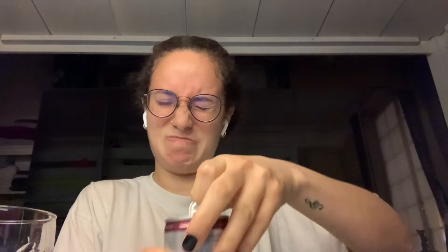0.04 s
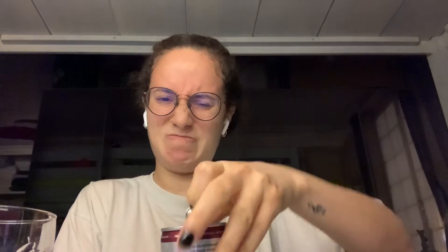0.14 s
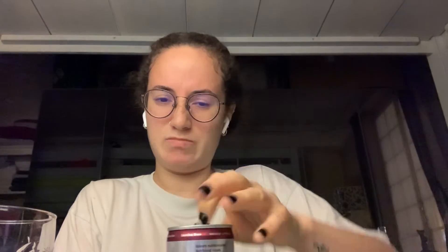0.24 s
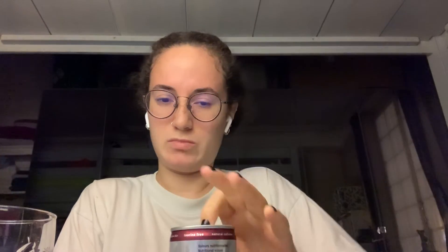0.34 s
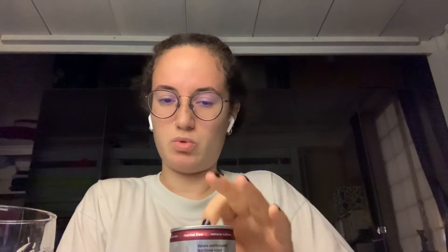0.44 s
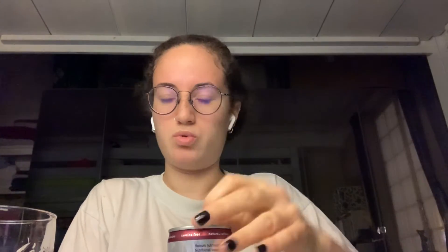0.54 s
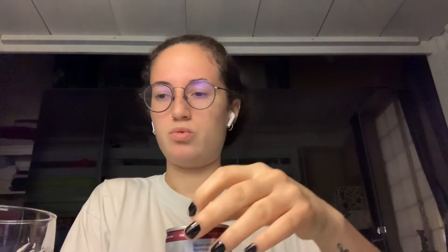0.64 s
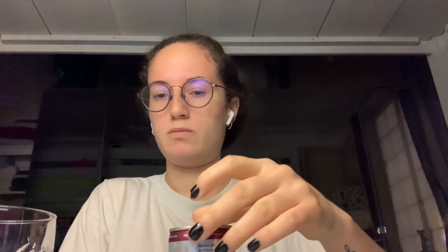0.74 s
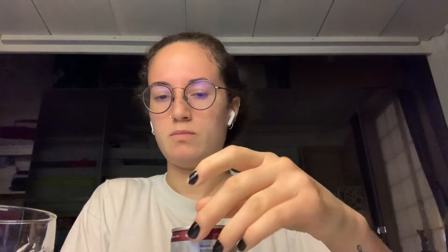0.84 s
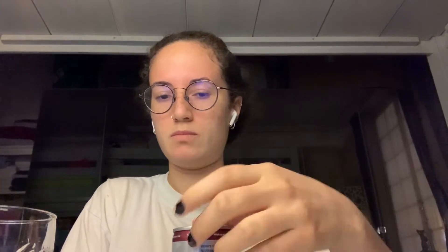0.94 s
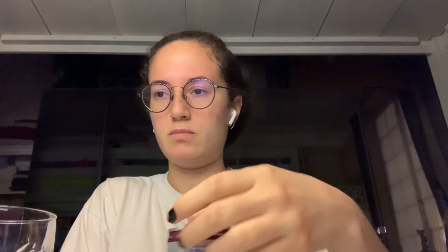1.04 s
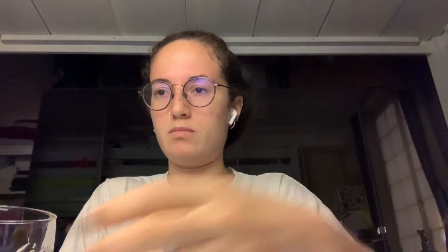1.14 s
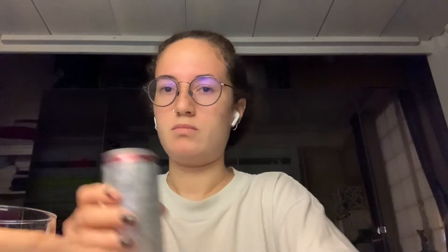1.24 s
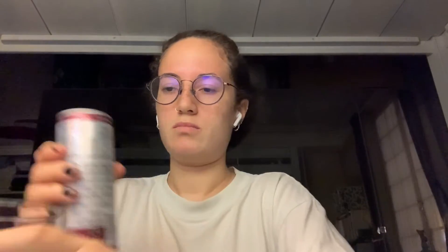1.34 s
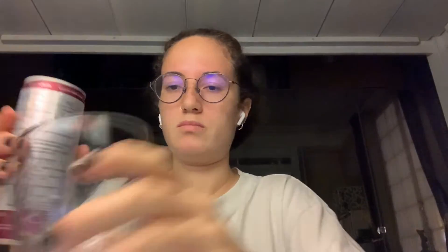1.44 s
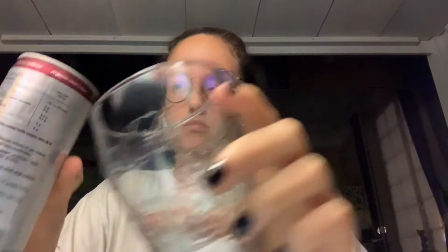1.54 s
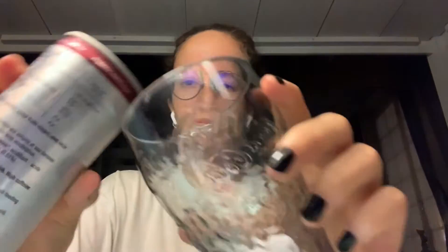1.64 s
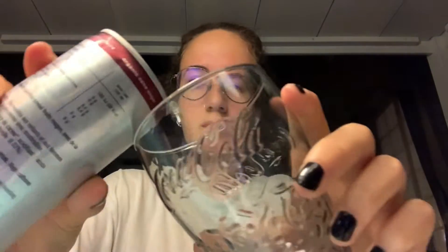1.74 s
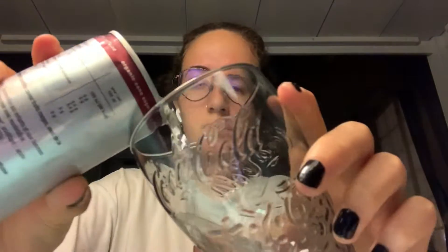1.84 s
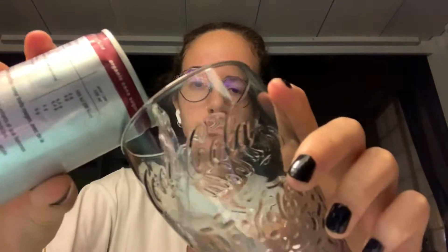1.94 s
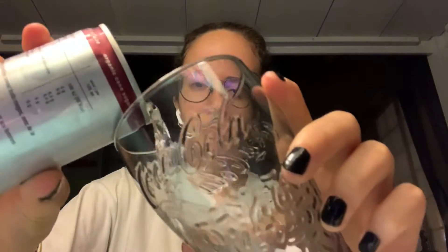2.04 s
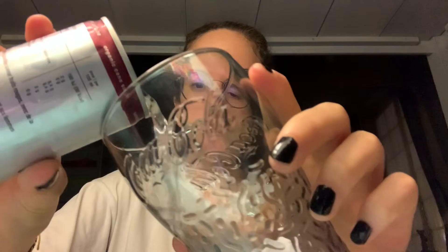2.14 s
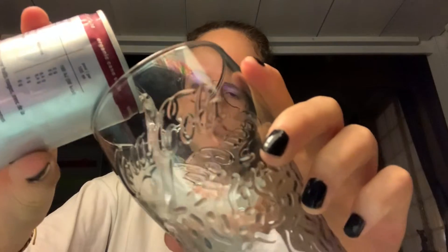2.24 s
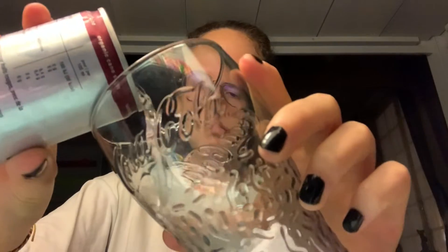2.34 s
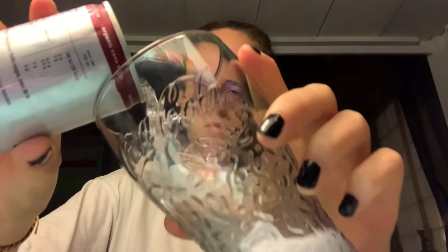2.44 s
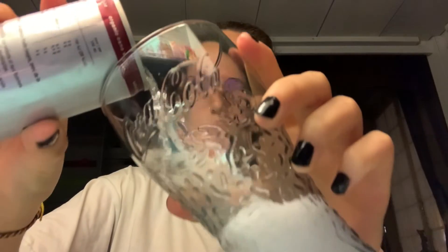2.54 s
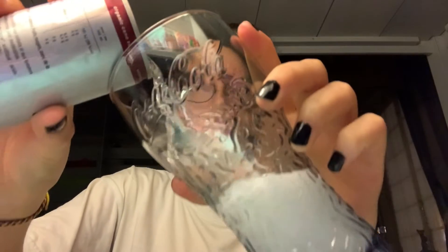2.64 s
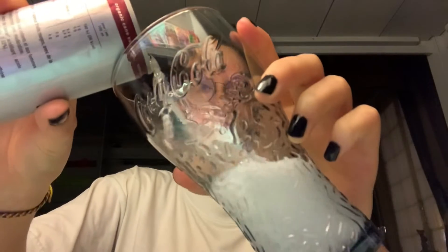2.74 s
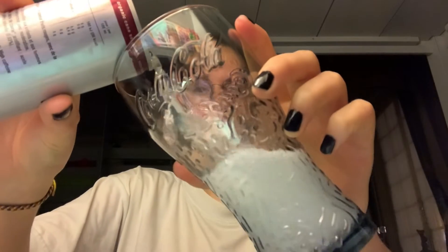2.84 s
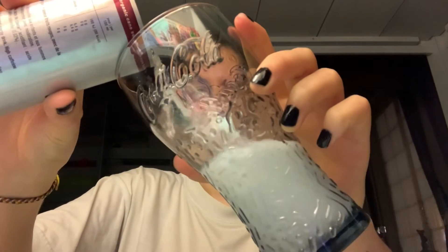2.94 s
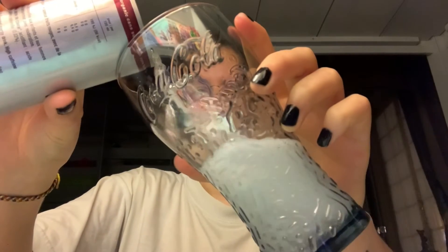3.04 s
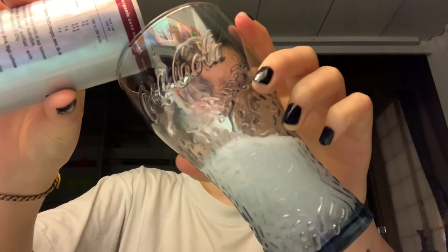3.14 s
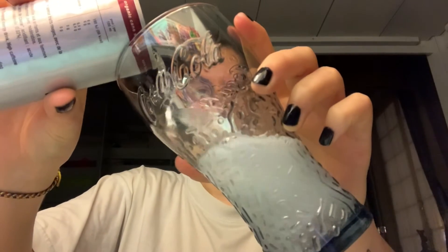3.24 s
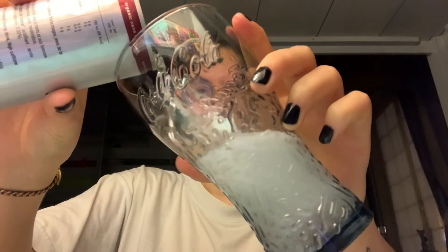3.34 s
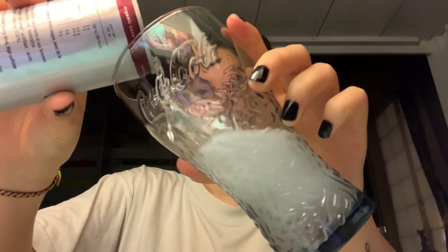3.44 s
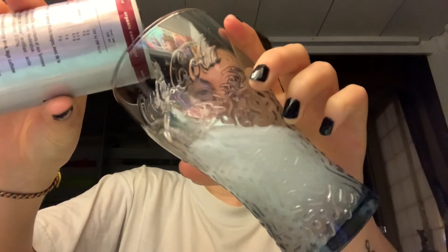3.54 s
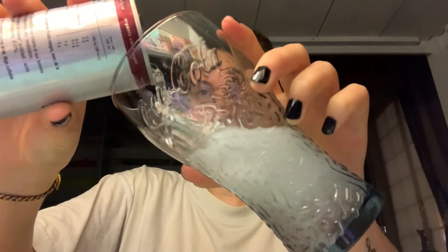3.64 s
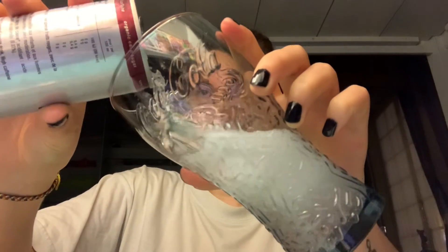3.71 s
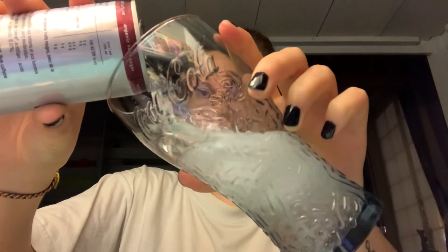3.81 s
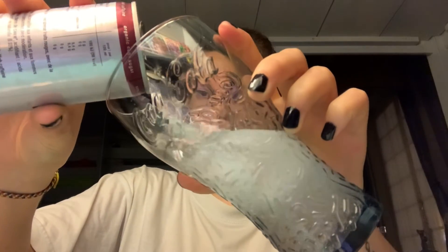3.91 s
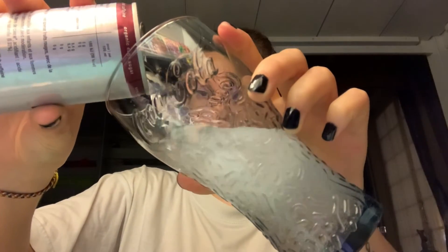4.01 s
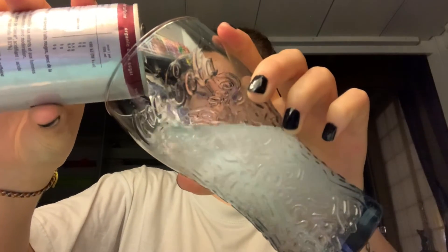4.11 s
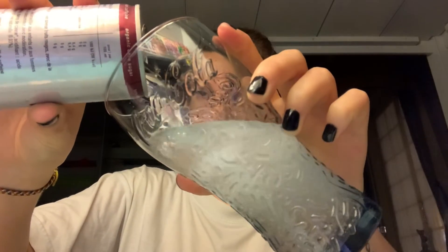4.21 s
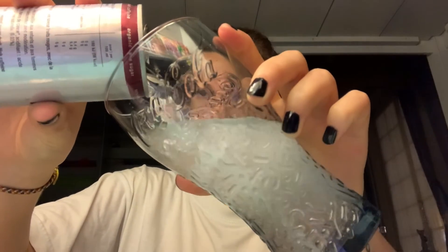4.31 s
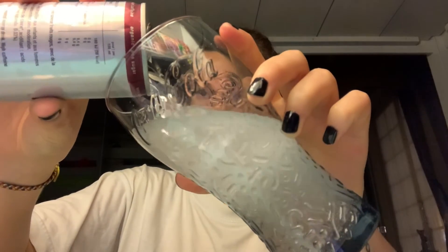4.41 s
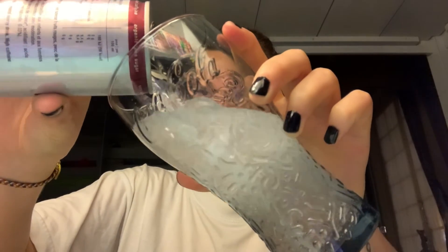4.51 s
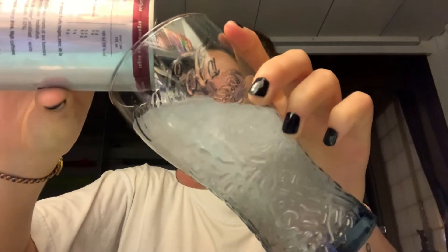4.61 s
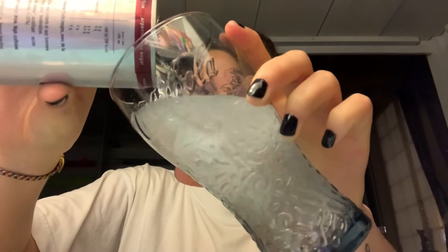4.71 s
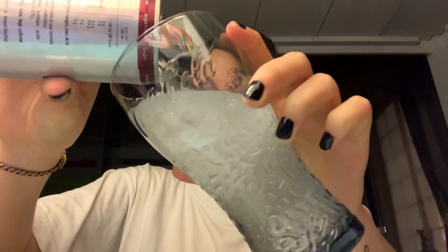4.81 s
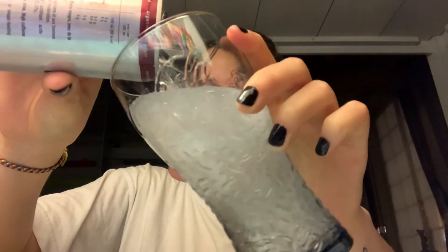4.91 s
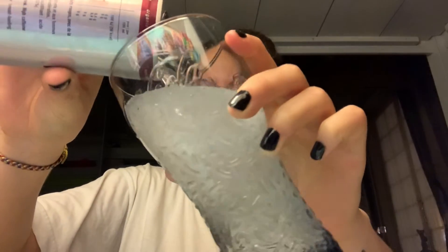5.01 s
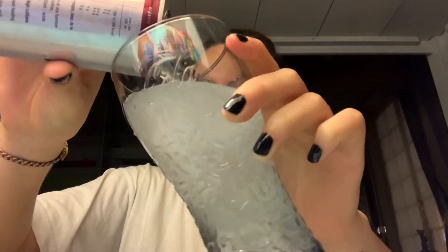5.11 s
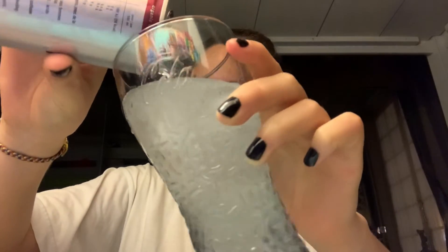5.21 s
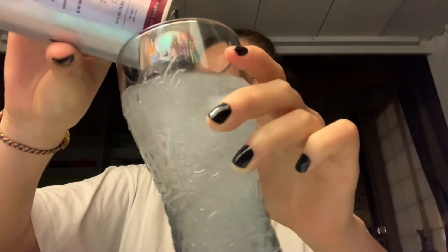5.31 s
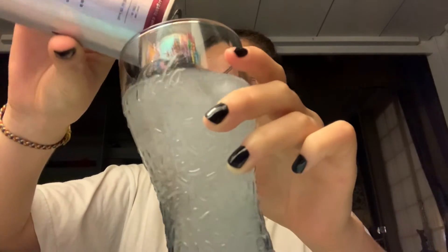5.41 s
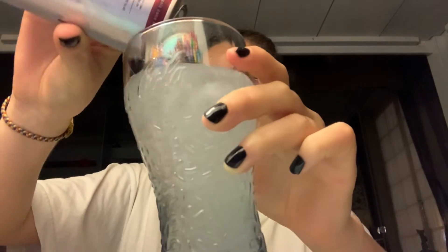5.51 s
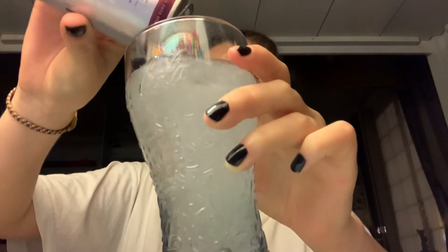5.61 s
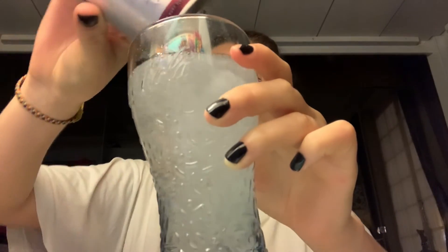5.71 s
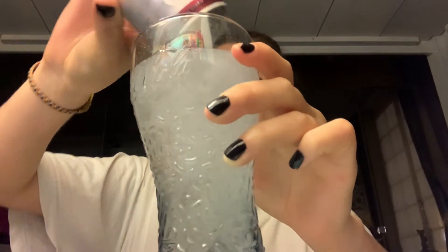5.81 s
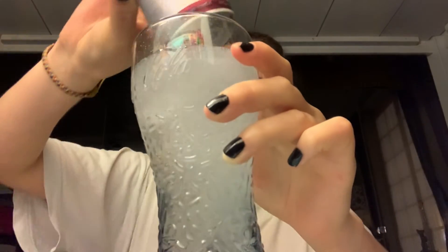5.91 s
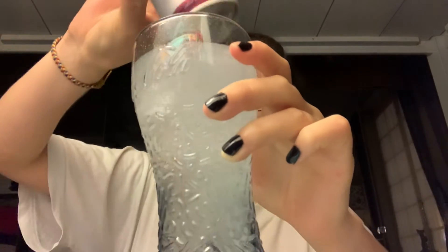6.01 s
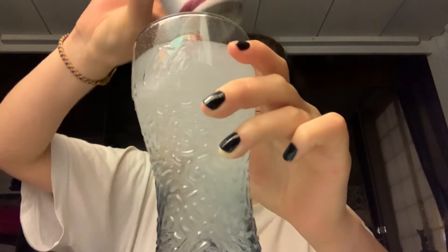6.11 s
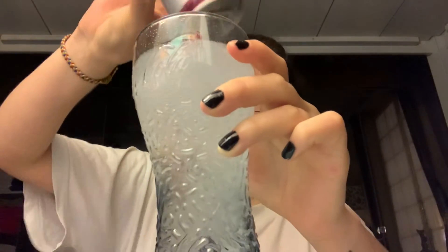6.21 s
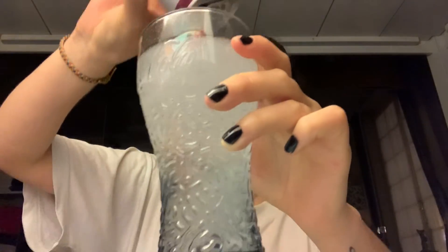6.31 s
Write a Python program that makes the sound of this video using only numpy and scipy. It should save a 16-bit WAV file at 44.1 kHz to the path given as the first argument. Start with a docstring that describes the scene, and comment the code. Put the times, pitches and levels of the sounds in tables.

```python
"""A drink can is cracked open close by: bursts of noise tear and ring the lid, and shaped hiss spits out as gas.
Nails tick on the tab, fingers rub, and there are short knocks and dull bumps: coloured noise and low pulses.
Can and glass touch with short damped rings. Then the drink is poured: it gulps and plops as ringing bubbles,
while random tiny pops gurgle, trickle, fizz and foam under the shifting air resonances of the glass.
Behind it lie the noise of a small quiet room and a faint electric buzz of alternating ticks."""
import sys
import numpy as np
from scipy import signal
from scipy.fft import rfft, irfft, next_fast_len
from scipy.io import wavfile
from scipy.ndimage import uniform_filter1d

SR = 44100
rng = np.random.default_rng(int(sys.argv[2]) if len(sys.argv) > 2 else 0)


def put_to_file(sound):
    """Save the sound as 16-bit audio at rate SR, in the file named by the first command-line argument."""
    columns = np.atleast_2d(sound).T  # one column per channel
    safe = np.clip(columns, -1, 1)
    whole_steps = np.round(safe * 32767)
    wavfile.write(sys.argv[1], SR, whole_steps.astype(np.int16))


N = 280160  # length [samples]
# Levels are relative: spectra are scaled to unit energy, and each source adds its own trim.


def amp(db):
    """Decibels to gain."""
    return 10 ** (np.asarray(db) / 20)


def unit(x):
    """Scale to rms 1."""
    return x / np.sqrt(np.mean(x ** 2) + 1e-20)


def clock(size=N):
    """Sample times in seconds."""
    return np.arange(size) / SR


def along(points, hz):
    """Read (frequency, value) points on a log frequency axis."""
    f, v = np.transpose(points)
    return np.interp(np.log(hz + 1), np.log(f), v)


def curves(rows, t):
    """Each column after the time, read at the times t."""
    s, *cols = np.transpose(rows)
    return [np.interp(t, s, c) for c in cols]


def add(track, s, sound):
    """Mix a sound into the track at time s."""
    part = track[max(round(s * SR), 0):][:len(sound)]
    part += sound[:len(part)]


def hump(hz, centre, width):
    """Magnitude of one resonance, top 1."""
    return 1 / (1 + (2 * (hz - centre) / width) ** 2)


def colour(x, points, modes=(), size=8192):
    """Minimum-phase filter of unit energy: a broad spectrum with resonances on it."""
    hz = np.fft.rfftfreq(size, 1 / SR)
    # every resonance lifts the spectrum, whatever the sign of its level
    peaks = sum((amp(abs(db)) - 1) * hump(hz, c, w) for c, w, db in modes)
    gain = amp(along(points, hz)) * (1 + peaks)
    # folding the cepstrum makes the response causal
    cepstrum = irfft(np.log(gain))[:size // 2]
    cepstrum[1:] *= 2
    response = irfft(np.exp(rfft(cepstrum, size)))
    return signal.fftconvolve(x, response / np.linalg.norm(response))[:N]


def swell(t, rise, t60):
    """An envelope that rises to 1 at t = 0 and then dies away."""
    rising = np.exp(-abs(t) / max(rise, 1e-5))
    return np.where(t < 0, rising, amp(-60 * abs(t) / t60))


def bursts(rows, size=8192):
    """Short bursts of noise from rows (time [s], level [dB], rise [s], t60 [s])."""
    track, t = np.zeros(N), clock(size) - .02  # leaves 20 ms for the rise
    for s, db, rise, t60 in rows:
        shape = swell(t, rise, t60)
        burst = shape * rng.standard_normal(size)
        # every burst carries the energy of its envelope
        add(track, s + t[0], amp(db) * burst * np.linalg.norm(shape) / np.linalg.norm(burst))
    return track


def ring(modes, size=8192):
    """One blow on a set of decaying modes, each at a slightly new strength."""
    t = clock(size)
    scatter_db = 1.2 * rng.standard_normal(len(modes))
    return sum(amp(db + off_db - 60 * t / t60) * np.sin(2 * np.pi * hz * t)
               for (hz, db, t60), off_db in zip(modes, scatter_db))


def pops(rate, spread_db):
    """Tiny bubbles bursting at random, rate per second, with sizes spread in dB; rms 1."""
    sizes = amp(spread_db * np.clip(rng.standard_normal(N), -3, 3))
    return unit((rng.random(N) < rate / SR) * sizes * rng.choice([-1, 1], N))


def bubble(hz, t60, chirp, size=8192):
    """A pulsing bubble: it starts softly and its pitch rises as it nears the surface."""
    t = clock(size)
    return (1 - np.exp(-t / 0.001)) * amp(-60 * t / t60) * np.sin(2 * np.pi * hz * t * (1 + chirp * t))


# how long the room rings: (frequency [Hz], t60 [s])
ROOM_DECAY = [(150, 0.25), (1000, 0.086), (8000, 0.067), (15000, 0.056)]


def room(x, size=256):
    """A short diffuse tail of noise that dies sooner in the treble."""
    hz, t, z = signal.stft(rng.standard_normal(SR // 2), SR, nperseg=size)
    fading = z * amp(-60 * t / along(ROOM_DECAY, hz)[:, None])
    tail = signal.istft(fading, SR, nperseg=size)[1]
    tail = tail * (1 - np.exp(-clock(len(tail)) / 0.00043))  # soft onset
    return signal.fftconvolve(x, tail / np.linalg.norm(tail))[:N]


# spectrum of the room noise: (frequency [Hz], level [dB])
ROOM_NOISE = [(24, -57), (40, -13.5), (190, -2.5), (300, -9), (440, -9.5), (600, -5.5), (750, -9.5),
              (1050, -8.5), (1920, -17), (2800, -14.5), (3090, -16), (4390, -17.5), (5360, -14),
              (6230, -21.5), (8200, -12.5), (9060, -23), (11300, -15.5), (15700, -13)]
# broad spectrum of the buzz: (frequency [Hz], level [dB])
BUZZ_SPECTRUM = [(1500, -39), (3000, -10), (7500, -19), (9200, -22), (11000, -11), (15000, -3),
                 (15800, 1.5)]
# resonances of the buzz: (frequency [Hz], width [Hz], lift [dB], sign ignored)
BUZZ_RESONANCES = [(3185, 166, 12.5), (5570, 120, 19), (6540, 100, 22), (8320, 620, 22.5), (11340, 550, 8),
                   (12500, 130, -3), (13600, 200, -15.5), (14700, 85, 0), (16760, 90, 6.5)]


def background(weak=0.83):
    """Room noise and a thin electric buzz: a strong and a weak opposite tick in each half mains cycle."""
    period = SR / 100.04  # half a mains cycle [samples]
    starts = np.arange(0, N - period, period)
    # placed at four times the sample rate for finer timing
    ticks = np.zeros(4 * N)
    ticks[np.round(4 * starts).astype(int)] = 1
    ticks[np.round(4 * starts + 2 * period).astype(int)] = -weak
    buzz = colour(unit(signal.resample_poly(ticks, 1, 4)), BUZZ_SPECTRUM, BUZZ_RESONANCES)
    noise = colour(rng.standard_normal(N), ROOM_NOISE)
    return amp(-64.5) * noise + amp(-66.0) * buzz


# how far the drink has taken up the air space of the glass: (time [s], share [0-1])
GLASS_FILL = [(2.3, 0), (2.55, 0.1), (2.95, 0.27), (3.9, 0.31), (4.2, 0.44), (4.5, 0.65), (5.2, 0.68),
              (5.6, 1), (6.2, 1)]
# air resonances over the drink, shifting as the glass fills:
# (empty [Hz], full [Hz], width [Hz], lift when empty [dB], at the flare [dB], when full [dB])
GLASS_AIR = [(1560, 2750, 450, 13, 8, -9), (2630, 4140, 700, -1, 7, 16), (4430, 6400, 470, 10, -1.5, 0),
             (6600, 4600, 510, 3, 8, 0), (6860, 9500, 400, 4.5, 4, -3), (9800, 12500, 1160, 7, -0.5, 6)]
FLARE_FILL = 1  # share of the fill at which the drink reaches the wide top of the glass


def air_modes(t):
    """(centre Hz, width Hz, lift dB) of each air resonance at the times t, set by the fill of the glass."""
    fill, = curves(GLASS_FILL, t)
    return [(empty_hz * (full_hz / empty_hz) ** fill, width, np.interp(fill, [0, FLARE_FILL, 1], lifts_db))
            for empty_hz, full_hz, width, *lifts_db in GLASS_AIR]


def air_pitch(t):
    """Pitch in Hz of the first air resonance, the lowest one."""
    return air_modes(t)[0][0]


def in_glass(x, size=512):
    """The air above the drink shapes the sound at its resonances; a random gain makes it drift in uneven patches."""
    hz, t, z = signal.stft(x, SR, nperseg=size)
    lift_db = sum(db * hump(hz[:, None], centre, width) for centre, width, db in air_modes(t))
    # noise smoothed over pitch, then over time
    patches = uniform_filter1d(rng.standard_normal(z.shape), size=3, axis=0)
    patches = uniform_filter1d(patches, size=45, axis=1)
    patch_db = 1.9 * unit(patches)
    return signal.istft(z * amp(lift_db + patch_db), SR, nperseg=size)[1][:N]


# hiss in the resonance across the surface: it sinks as the surface widens, then rises and blurs
# under the foam: (time [s], centre [Hz], width [Hz], level [dB])
SURFACE_BAND = [(2.05, 6450, 406, -82), (2.35, 6420, 400, -67), (2.8, 6300, 400, -80),
                (3.5, 6130, 320, -66), (4.1, 5860, 280, -76), (4.6, 5680, 280, -72),
                (5.2, 5630, 280, -71.5), (5.5, 5900, 600, -77.5), (5.78, 6140, 850, -68.5),
                (6.05, 6500, 1010, -77), (6.35, 6000, 1000, -83)]


def surface_hiss(size=1024):
    """Bubbles bursting on the drink sound the air across the glass in one gliding band."""
    hz, t, z = signal.stft(pops(rate=1400, spread_db=5), SR, nperseg=size)
    centre_hz, width_hz, _ = curves(SURFACE_BAND, t)
    _, _, level_db = curves(SURFACE_BAND, clock())
    band = signal.istft(z * hump(hz[:, None], centre_hz, width_hz), SR, nperseg=size)[1][:N]
    return amp(level_db) * unit(band)


def babble(pitch, scatter, t60, count):
    """Small ringing bubbles at random moments, scattered around a pitch curve; rms 1."""
    track = np.zeros(N)
    moments = rng.integers(0, N, count)
    chance = np.clip(rng.standard_normal((count, 2)), -2, 2)
    for at, (off, loud) in zip(moments, chance):
        hz = pitch[at] * np.exp(scatter * off)
        add(track, at / SR, amp(0.6 * loud) * bubble(hz, t60, chirp=4.1, size=1500))
    return unit(track)


# the stream churns the drink where it plunges in: (time [s], level [dB])
GURGLE_LEVEL = [(1.9, -73.5), (2.2, -77.5), (2.6, -86), (2.9, -80.5), (3.2, -70.5), (3.7, -90), (4.1, -90),
                (4.35, -71), (4.55, -76), (5.0, -102), (5.6, -63.5), (5.9, -82), (6.2, -83)]
# the trickle comes in surges: (time [s], level [dB])
TRICKLE_LEVEL = [(1.9, -88), (2.15, -102), (2.45, -79.5), (3.2, -74), (3.7, -78), (4.1, -78), (4.6, -86),
                 (5.0, -86), (5.35, -81), (5.6, -80), (5.9, -76.5), (6.35, -80)]
# gas fizzes out while the stream strikes the bare wall, and again as the glass is righted:
# (time [s], level [dB])
FIZZ_LEVEL = [(2.05, -76), (2.27, -68.5), (2.55, -62), (3.0, -61), (3.75, -59.5), (4.0, -64), (4.25, -74),
              (4.6, -72.5), (5.0, -70), (5.4, -89), (5.8, -70.5), (6.35, -70.5)]
# the head of foam: (time [s], level [dB])
FOAM_LEVEL = [(2.05, -78), (2.25, -63), (2.5, -61.5), (2.8, -61.5), (3.8, -64), (4.5, -66.5), (5.5, -69.5),
              (5.85, -60), (6.35, -65.5)]
# their spectra: (frequency [Hz], level [dB])
GURGLE_SPECTRUM = [(350, -16.5), (620, -2.5), (800, -1), (1000, -1.5), (1200, 10), (1450, -15.5),
                   (1800, -6), (2500, -12.5)]
TRICKLE_SPECTRUM = [(900, -18), (1300, 0), (1600, -7), (2000, 4.5), (2800, 10), (3400, 2), (3900, -6),
                    (5000, -30)]
FIZZ_SPECTRUM = [(2500, -31), (3900, -18), (4400, -5), (5000, -5), (5450, -9.5), (6000, -10), (6500, -9),
                 (6950, 1), (7400, -5), (7800, 0), (8400, -1.5), (9300, -8.5), (12000, -30)]
FOAM_SPECTRUM = [(6000, -34), (9200, -2.5), (9900, -1.5), (10400, -2), (11100, 3.5), (11850, -1.5),
                 (12300, -2), (12900, 2.5), (13350, 5), (13800, 0), (15000, 0.5), (15700, 2.5)]


def pour():
    """The stream gurgles and trickles down the wall, gas fizzes out of it and the foam bursts finely on top."""
    t = clock()
    (gurgle_db,), (trickle_db,) = curves(GURGLE_LEVEL, t), curves(TRICKLE_LEVEL, t)
    (fizz_db,), (foam_db,) = curves(FIZZ_LEVEL, t), curves(FOAM_LEVEL, t)
    gurgle = amp(gurgle_db) * colour(pops(rate=500, spread_db=4.5), GURGLE_SPECTRUM)
    # the stream traps bubbles that ring near the lowest resonance of the air above the drink
    trapped = babble(air_pitch(t), scatter=.26, t60=.016, count=1100)
    patter = colour(pops(rate=900, spread_db=5), TRICKLE_SPECTRUM)
    trickle = amp(trickle_db - 2.5) * unit(patter + amp(-7) * trapped)
    # some gas bubbles are large enough to ring out of the fizz
    beads = babble(np.full(N, 7000), scatter=0.11, t60=0.026, count=900)
    fine = colour(pops(rate=4400, spread_db=0.5), FIZZ_SPECTRUM)
    fizz = amp(fizz_db - 2.5) * unit(fine + amp(-11.0) * beads)
    foam = amp(foam_db + 2.5) * colour(pops(rate=6000, spread_db=3), FOAM_SPECTRUM)
    flow = np.clip((t - 1.75) / 0.33, 0, 1)  # the pour fades in
    return flow * (in_glass(gurgle + trickle + fizz + foam) + surface_hiss())


# single bubbles in the glass: (time [s], level [dB], starting pitch [Hz])
SINGLE_BUBBLES = [(4.106, -56, 860), (4.447, -60, 8400), (4.499, -52.5, 7300), (4.52, -51.5, 5670),
                  (4.531, -58, 5900), (5.522, -48.5, 5920)]


def plops(t60=0.031):
    """Now and then one larger bubble sounds out of the fizz."""
    track = np.zeros(N)
    for s, db, hz in SINGLE_BUBBLES:
        add(track, s, amp(db + 5.5) * bubble(hz, t60, chirp=1))
    return track


def scattered(start, end, pitch_spread, count):
    """Loosely spaced moments in a span: rows (time [s], random level [dB], random pitch ratio)."""
    times = start + (end - start) * (np.arange(count) + rng.random(count)) / count
    chance = np.clip(rng.standard_normal((count, 2)), -2, 2)
    return zip(times, 2 * chance[:, 0], np.exp(pitch_spread * chance[:, 1]))


# runs of small gulps: (start [s], end [s], level [dB])
GULP_RUNS = [(4.146, 4.321, -64.5), (4.274, 4.462, -58.5), (4.481, 4.752, -58.5), (4.78, 5.108, -84),
             (5.464, 5.76, -63), (5.782, 6.303, -65.5)]
SIP_PITCH, SIP_SCATTER = 0.99, 0.097  # pitch over the lowest air resonance [ratio], its relative spread
SIP_SPLASH_DB, SIP_BODY_DB = -16, -3.5  # splash and hollow body over the level of the gulp [dB]


def small_gulps():
    """Runs of gulps near the lowest air resonance, as rows with the columns of GULPS."""
    rows = []
    for start, end, run_db in GULP_RUNS:
        for s, off_db, ratio in scattered(start, end, SIP_SCATTER, count=11):
            db, hz = run_db + off_db, air_pitch(s) * SIP_PITCH * ratio
            rows.append((s, db, hz, db + SIP_SPLASH_DB, db + SIP_BODY_DB))
    return rows


def droplets(gulps, spread_s=0.015, drop_db=-18, count=5):
    """Every gulp throws a few droplets just after it, as rows for bursts."""
    delays = rng.exponential(spread_s, (len(gulps), count))
    return [(s + delay, db + drop_db + 3 * rng.normal(), .0002, .012)
            for (s, db, *_), row in zip(gulps, delays) for delay in row]


# gulps and plops of the pour, strong and weak:
# (time [s], level [dB], starting pitch [Hz], splash level [dB], hollow body level [dB])
GULPS = [(1.8722, -46, 2910, -72, -77), (1.885, -56, 1920, -55, -57), (1.9218, -52, 2880, -56, -64),
         (1.9358, -48.5, 1140, -61, -43.5), (1.9647, -51, 1370, -59, -44.5), (1.9997, -60, 1290, -65, -47),
         (2.044, -42, 1585, -69, -38.5), (2.0639, -41.5, 1570, -72, -44), (2.237, -60, 940, -76, -55.5),
         (2.416, -55.5, 590, -70, -52), (2.425, -52.5, 1640, -55, -55), (2.44, -62, 1790, -72, -59),
         (2.671, -67, 840, -64, -48.5), (2.678, -58, 1230, -70, -66), (3.017, -56, 1380, -68, -69),
         (3.16, -54, 1250, -64, -54), (3.453, -56, 1400, -58, -65), (3.87, -60, 2900, -55, -73),
         (4.1133, -55.5, 2000, -74, -73), (4.1511, -48.5, 2040, -60, -68), (4.2135, -66, 1950, -72, -80),
         (4.2307, -54, 2010, -59, -74), (4.3035, -55, 2410, -69, -60), (4.3315, -49, 2240, -51, -58),
         (4.346, -42.5, 3270, -48.5, -53), (4.3878, -52, 2130, -74, -65), (4.393, -44, 1980, -72, -67),
         (4.413, -42, 1990, -53.5, -53), (4.4474, -56, 2020, -72, -64), (4.6034, -39, 2000, -42, -47.5),
         (4.621, -49, 1940, -56, -64), (4.6728, -46, 2610, -60, -60), (4.6817, -44.5, 1594, -44, -41),
         (4.714, -43, 1620, -46.5, -42), (4.779, -44, 2590, -45, -54), (4.798, -49, 2480, -50, -67),
         (4.8108, -54, 2450, -65, -63), (4.8418, -48.5, 2370, -53, -49), (4.936, -47, 2590, -60, -53.5),
         (5.036, -53, 2500, -54, -74), (5.0575, -45, 2610, -54, -58.5), (5.071, -53, 2800, -68, -53),
         (5.275, -35.5, 2500, -38.5, -50.5), (5.291, -45.5, 2780, -52, -66), (5.327, -40, 2450, -41, -55),
         (5.3634, -36.5, 2670, -38.5, -51), (5.376, -57, 2700, -67, -70), (5.4671, -41, 2720, -40.5, -53),
         (5.4742, -47.5, 2800, -50, -61), (5.4912, -38, 2710, -42.5, -57), (5.497, -50, 2670, -36.5, -53),
         (5.5592, -50, 3320, -47, -49), (5.6043, -36.5, 2960, -51.5, -50), (5.627, -51, 2970, -64, -57),
         (5.647, -54, 2760, -64, -65), (5.6523, -46, 2600, -63, -47), (5.6698, -42, 3000, -38, -46),
         (5.704, -43, 2930, -41.5, -50.5), (5.739, -56, 1790, -60, -74), (5.9963, -54, 2500, -38.5, -48),
         (6.0305, -47.5, 2880, -50, -73), (6.071, -65, 2920, -51, -58), (6.1174, -41.5, 2620, -44.5, -50.5),
         (6.211, -63, 3100, -51.5, -56), (6.2395, -51.5, 3390, -50, -56)]
# spectra of the splash, the hollow body and the churning drink: (frequency [Hz], level [dB])
SPLASH_SPECTRUM = [(1000, -17), (2000, 3.5), (3200, 8.5), (4200, 4.5), (5000, 2), (6000, 8.5), (7000, 5.5),
                   (8200, -3.5), (10000, -5.5), (15800, 0)]
BODY_SPECTRUM = [(350, -20), (550, -12), (780, 10.5), (1000, 16), (1250, 15), (1570, -15), (1850, 10),
                 (2400, -29), (4000, -16.5)]
SLOSH_SPECTRUM = [(400, -15), (750, 8), (1000, -5.5), (1270, 10), (1600, 5), (2000, -3.5), (2800, 2),
                  (3700, -26.5), (6000, -26.5), (12000, -25)]
SLOSH_DB, SLOSH_T60 = -16, 0.035  # churn after a gulp: level over its hollow body column [dB], decay [s]


def glugs(t60=0.017, ring_db=-15, ring_t60=0.06):
    """Each gulp or plop snaps shut with a splash, pulses as a bubble, sounds a hollow body and churns the drink."""
    track, gulps = np.zeros(N), GULPS + small_gulps()
    for s, db, hz, _, _ in gulps:
        # three longer, weaker rings close to the pitch of the bubble
        cavity = ring([(hz * (1 + 0.0537 * rng.normal()), ring_db, ring_t60) for _ in range(3)])
        add(track, s, amp(db + 2.0) * (bubble(hz, t60, chirp=0.41) + cavity))
    snaps = [(s, db + 2.0, .0005, .012) for s, _, _, db, _ in gulps]
    splash = colour(bursts(snaps + droplets(gulps)), SPLASH_SPECTRUM)
    thumps = [(s + 0.00031, db - 6.0, .0007, .016) for s, _, _, _, db in gulps]
    body = colour(bursts(thumps), BODY_SPECTRUM)
    churns = [(s + .003, db + SLOSH_DB, .003, SLOSH_T60) for s, _, _, _, db in gulps]
    slosh = colour(bursts(churns), SLOSH_SPECTRUM)
    return track + splash + body + slosh


# can and glass touch: (time [s], level [dB], ring of the can [dB], ring of the glass wall [dB])
TOUCHES = [(1.454, -39, -49, -67), (1.4622, -20.5, -72, -52), (1.592, -36.5, -59, -67),
           (1.698, -36, -45, -50), (1.703, -39, -59, -43), (1.863, -43.5, -61, -61),
           (1.905, -48, -65, -59.5), (2.086, -44, -68, -70)]
# spectrum of the contact noise: (frequency [Hz], level [dB])
CONTACT_SPECTRUM = [(500, -59), (1500, 6.5), (4500, -25), (6500, 11.5), (8500, 6.5), (10200, 18),
                    (12500, -1), (15800, -7)]
# modes of the high ring, the full can and the glass wall: (frequency [Hz], level [dB], t60 [s])
HIGH_RING = [(9950, -22, 0.13), (10200, 3, 0.017), (11200, -29, 0.031)]
FULL_CAN = [(1270, -22, 0.033), (1460, -7, 0.039), (2070, -12, 0.014), (2715, 0, 0.022), (3060, -1.5, .04)]
GLASS_WALL = [(6170, -15, 0.035), (6700, 5, 0.021), (7400, -18, 0.025)]


def clinks():
    """Light touches of can and glass, damped by the hands; the point of contact decides which of them rings."""
    track = colour(bursts([(s, db - 10.0, .0003, .009) for s, db, _, _ in TOUCHES]), CONTACT_SPECTRUM)
    for s, db, can_db, wall_db in TOUCHES:
        high = amp(db - 7.0) * ring(HIGH_RING)
        add(track, s, high + amp(can_db) * ring(FULL_CAN) + amp(wall_db) * ring(GLASS_WALL))
    return track


# dull low bumps: (time [s], level [dB], pitch [Hz], swell [s])
DULL_BUMPS = [(0.048, -50.5, 190, 0.0023), (0.0991, -46.5, 330, 0.0012), (0.1061, -28, 370, 0.0021),
              (0.1066, -31.5, 564, 0.0027), (.114, -39, 504, 0.0021), (0.129, -48, 247, 0.0053),
              (0.152, -57, 210, 0.0029), (.165, -55.5, 199, 0.0073), (0.244, -53, 164, 0.0027),
              (.351, -52.5, 299, 0.0032), (0.463, -53, 149, 0.0032), (0.63, -53, 140, 0.0016),
              (0.823, -52, 173, 0.0025), (1.304, -55, 320, 0.0029), (1.606, -52, 630, 0.0018),
              (1.657, -49.5, 455, 0.0013), (1.671, -51.5, 207, 0.0016), (5.373, -51, 263, 0.0021),
              (5.39, -37, 321, 0.0045), (5.415, -67, 190, 0.0047), (5.432, -50, 173, 0.0039),
              (5.48, -44.5, 210, 0.00086), (5.488, -49, 260, 0.0014), (5.512, -45.5, 230, 0.0013),
              (5.522, -52, 146, 0.0046), (5.611, -44.5, 276, 0.0021), (5.632, -57, 182, 0.0044),
              (5.65, -50, 155, 0.0021), (5.675, -50, 165, 0.0028), (5.722, -49.5, 161, 0.0025),
              (5.763, -49, 390, 0.0018), (5.803, -54.5, 135, .004), (5.829, -46.5, 197, 0.0028),
              (5.868, -47, 190, 0.003), (5.876, -54, 300, 0.0026), (5.896, -50, 290, 0.0024),
              (5.92, -39, 323, 0.0022), (5.927, -42.5, 400, 0.0033), (5.972, -49.5, 173, 0.0024),
              (6.004, -49, 560, 0.005)]
# what follows a bump: (frequency [Hz], level [dB])
RUMBLE_SPECTRUM = [(60, -41), (120, 6), (160, 8.5), (260, -6), (500, -9), (1200, -15), (3000, -59)]


def bumps(size=4096):
    """Soft low pushes that swell and die within a few cycles, each trailing a short rumble."""
    track, t = np.zeros(N), clock(size)
    for s, db, hz, rise in DULL_BUMPS:
        push = (t / rise) ** 2 * np.exp(2 - 2 * t / rise)  # reaches 1 at t = rise
        add(track, s, amp(db) * push * np.sin(2 * np.pi * hz * t))
    trails = [(s + 0.0024, db - 19.0, .002, .1) for s, db, _, _ in DULL_BUMPS]
    return track + colour(bursts(trails), RUMBLE_SPECTRUM)


# low ring of the tab: (frequency [Hz], level [dB])
TAB_LOW_SPECTRUM = [(500, -10), (1700, -7), (2300, -7.5), (2650, 4), (2880, 1.5), (3080, 13.5),
                    (3400, -11.5), (3750, -21), (6000, -16.5)]
TAB_SHIFT = 0.017  # relative random spread of this ring's pitch from tick to tick


def tab_ring():
    """The tab's short low ring, at a slightly new pitch for each tick."""
    track = np.zeros(N)
    for s, _, _, rise, db in NAIL_TICKS:
        shift = np.exp(TAB_SHIFT * np.clip(rng.normal(), -2, 2))
        shifted = [(hz * shift, level) for hz, level in TAB_LOW_SPECTRUM]
        track += colour(bursts([(s, db, rise, .022)]), shifted)
    return track


# nails on the tab and lid, also read by tab_ring: (time [s], level [dB],
# brightness above 10 kHz over that level [dB], rise [s], low ring of the tab [dB])
NAIL_TICKS = [(0.2361, -15.5, -15.5, 0.0016, -44.5), (.289, -60, -10, 0.0011, -63),
              (0.3478, -41.5, -2, 0.0005, -51.5), (0.544, -51, -11, 0.009, -53.5),
              (0.5865, -42, -13, 0.009, -52), (0.604, -42, -31, 0.0035, -47.5),
              (0.635, -43, -21, 0.0067, -48.5), (0.64, -44, -16, 0.0047, -48.5),
              (0.701, -54, -14, 0.0015, -57), (.823, -20.5, -8, 0.0016, -50.5),
              (.95, -37.5, -7, 0.0007, -48.5), (1.016, -59, -8, .002, -54.5),
              (1.064, -41.5, -14, 0.0011, -61)]
# the tick and its bright top: (frequency [Hz], level [dB])
TAB_SPECTRUM = [(500, -66), (1600, -34), (2400, -5), (4200, -7.5), (5500, -8.5), (6600, 1), (8000, -5),
                (9200, -10), (10000, -10), (11000, -21), (15800, -10)]
TAB_TOP_SPECTRUM = [(2000, -63), (7000, -54), (10000, -6), (10700, -17), (11800, -6.5), (12900, -7.5),
                    (14100, -5), (14800, -7), (15800, -12)]
# resonances of the tick: (frequency [Hz], width [Hz], lift [dB])
TAB_RESONANCES = [(6550, 320, 7), (7730, 320, 16), (8500, 180, 5), (9700, 236, 9.5)]
# fingers shift their grip on can and glass: (time [s], level [dB], rise [s], t60 [s])
GRIP_SHIFTS = [(.86, -71.5, 0.036, 0.59), (1.47, -70.5, .025, .25), (1.61, -62.5, 0.046, 0.091),
               (1.685, -62, 0.018, .2), (1.9, -80, 0.019, 0.5)]
# spectrum of the rubbing: (frequency [Hz], level [dB])
RUB_SPECTRUM = [(150, -9), (400, -6), (800, 2.5), (1300, 3), (1900, -8.5), (3000, -13), (4000, -22),
                (10000, -35)]
# short knocks, the second one soft and of unsure origin: (time [s], level [dB])
KNOCKS = [(0.0976, -34), (0.453, -41)]
# spectrum of the knock: (frequency [Hz], level [dB])
KNOCK_SPECTRUM = [(180, -68), (300, 0), (1200, 6.5), (1700, -9.5), (2590, -8.5), (2990, -11.5),
                  (4540, -5.5), (5600, -12), (8240, -30), (10100, -20), (14000, -60)]


def handling():
    """Nails catch and slip off the tab, fingers rub on can and glass, and two short knocks sound."""
    ticks = [(s, db - 12.0, rise, .018) for s, db, _, rise, _ in NAIL_TICKS]
    tab = colour(bursts(ticks), TAB_SPECTRUM, TAB_RESONANCES)
    bright = [(s, db + bright_db, rise, .016) for s, db, bright_db, rise, _ in NAIL_TICKS]
    top = colour(bursts(bright), TAB_TOP_SPECTRUM)
    grip = sum(amp(db) * swell(clock() - s, rise, t60) for s, db, rise, t60 in GRIP_SHIFTS)
    rub = grip * colour(pops(rate=3000, spread_db=7), RUB_SPECTRUM)
    knock = colour(bursts([(s, db, .0002, .018) for s, db in KNOCKS]), KNOCK_SPECTRUM)
    return tab + tab_ring() + top + rub + knock


# the lid tears in jerks and its flap buckles inwards: (time [s], level [dB], t60 [s], buckle level [dB])
LID_TEARS = [(0.0349, -8, .014, -41), (0.038, -19, .012, -46), (0.0411, -19.5, .014, -38),
             (0.0423, -11.5, .007, -24)]
# spectra of the tearing lid and the buckling flap: (frequency [Hz], level [dB])
LID_SPECTRUM = [(150, -21), (700, -19), (1100, -39), (1600, -40), (3000, -7.5), (6300, -13.5), (8000, -7.5),
                (10000, -3), (14500, 4), (15800, -2)]
FLAP_SPECTRUM = [(200, -36), (850, -45), (1160, 8), (1550, -3), (1950, 5), (2600, 0), (3300, 1),
                 (4000, -26), (8000, -10)]
# resonances of the lid: (frequency [Hz], width [Hz], lift [dB])
LID_RESONANCES = [(1165, 72, 0), (2690, 140, 11), (4680, 420, 14), (6900, 70, 8.5), (7900, 300, 23.5),
                  (8420, 330, 20), (9560, 130, 11), (11400, 200, 10), (12400, 250, 10.5), (14700, 400, 4)]
# escaping gas: (time [s], level [dB])
GAS_LEVEL = [(.036, -59), (.044, -20.5), (.055, -32), (.07, -39), (.095, -52), (.14, -80), (.2, -110)]
# spectrum of the gas jet: (frequency [Hz], level [dB])
JET_SPECTRUM = [(350, -91), (600, -31), (956, -21), (1400, -11), (1700, -13.5), (2330, 5), (2860, -16),
                (3060, -3), (3370, -18.5), (4130, -5), (6580, -6), (7550, 0), (10800, -3.5), (14800, -3),
                (15800, 5.5)]
# the whole lid as a drumhead: pitch [Hz], level over a tear [dB], ring [s]
DRUM_HZ, DRUM_DB, DRUM_T60 = 1142, -26.5, 0.071


def opening():
    """The score line tears and rings the lid, the flap pops in and the pressure escapes in a short spit."""
    tears = [(s, db, .0001, t60) for s, db, t60, _ in LID_TEARS]
    crack = colour(bursts(tears), LID_SPECTRUM, LID_RESONANCES)
    for s, db, _, _ in LID_TEARS:
        add(crack, s + 0.00051, amp(db + DRUM_DB) * ring([(DRUM_HZ, 0, DRUM_T60)]))
    buckle = colour(bursts([(s, db, .0001, .014) for s, _, _, db in LID_TEARS]), FLAP_SPECTRUM)
    gas_db, = curves(GAS_LEVEL, clock())
    gas = amp(gas_db) * colour(rng.standard_normal(N), JET_SPECTRUM)
    return crack + buckle + gas


def scene():
    """Everything is close to the microphone; the room faintly answers all but the pour and the background."""
    crack, ticks, thuds = opening(), handling(), bumps()
    glass, gulps = clinks(), glugs() + plops()
    near = crack + ticks + thuds + glass + gulps
    walls = room(amp(-25.0) * crack + amp(-9.0) * ticks + amp(-18.5) * thuds
                 + amp(-10.0) * glass + amp(-12.0) * gulps)
    return (near + walls + pour() + background())[None]


TOP_HZ = 15850  # band limit of the microphone [Hz]


def record(dry, low_hz=96):
    """The microphone drops the deep bass and keeps nothing above its band limit."""
    thin = signal.sosfilt(signal.butter(6, low_hz, "high", fs=SR, output="sos"), dry)
    m = next_fast_len(N + SR // 2)
    passed = np.fft.rfftfreq(m, 1 / SR) < TOP_HZ
    return irfft(rfft(thin, m) * passed, m)[..., :N]


dry = scene()
out = record(dry)
put_to_file(out)
```